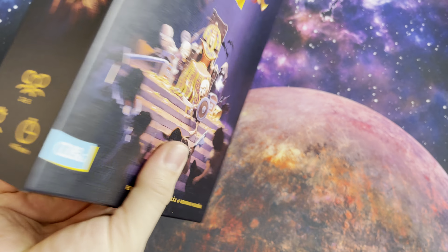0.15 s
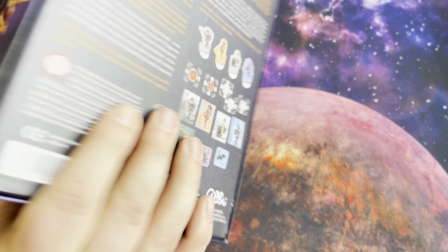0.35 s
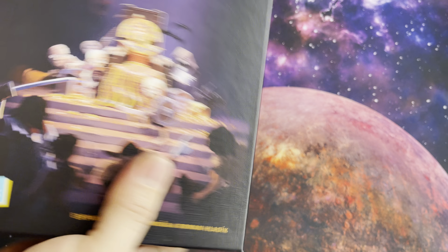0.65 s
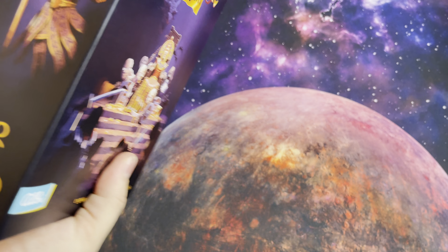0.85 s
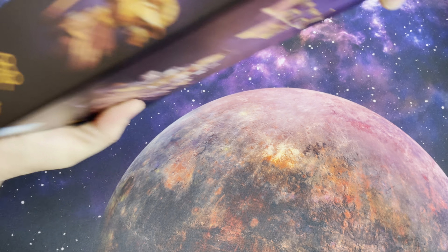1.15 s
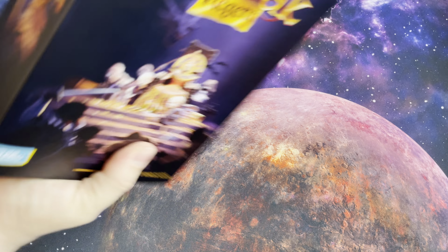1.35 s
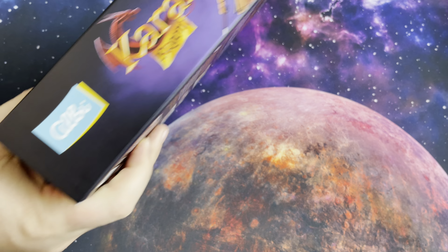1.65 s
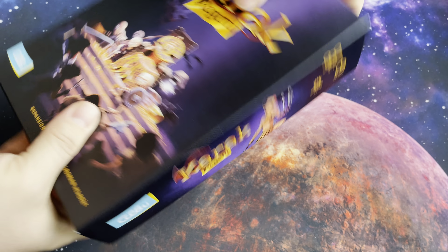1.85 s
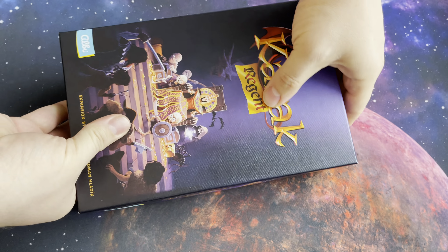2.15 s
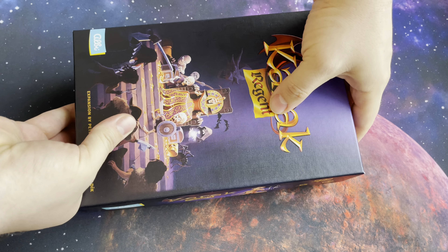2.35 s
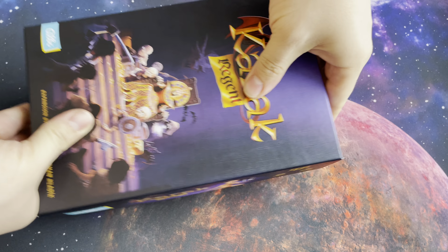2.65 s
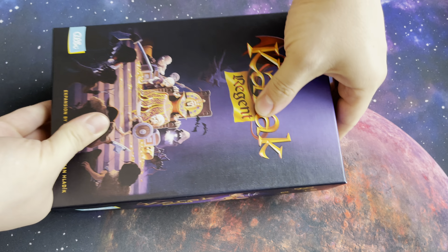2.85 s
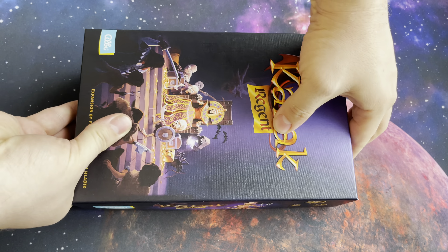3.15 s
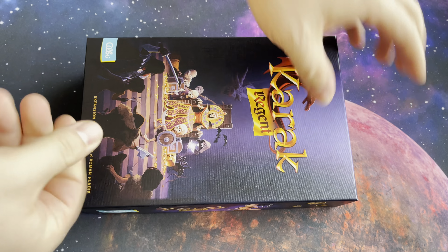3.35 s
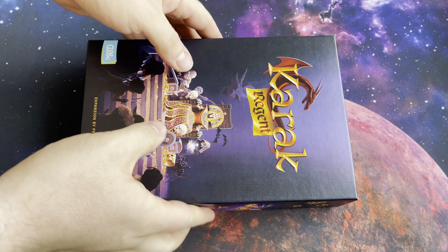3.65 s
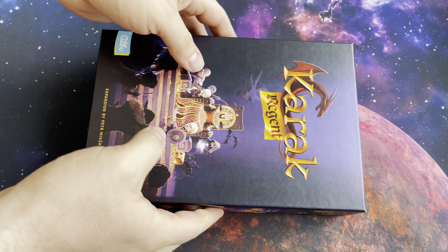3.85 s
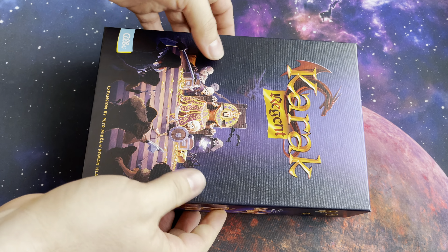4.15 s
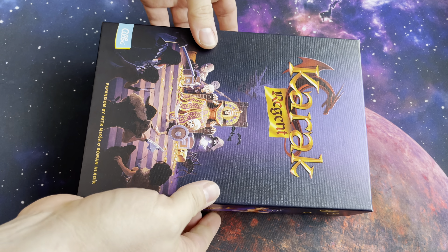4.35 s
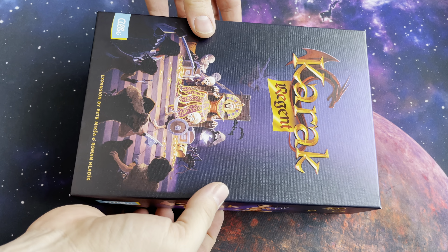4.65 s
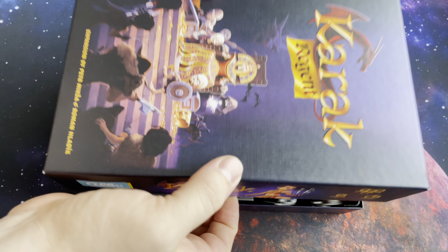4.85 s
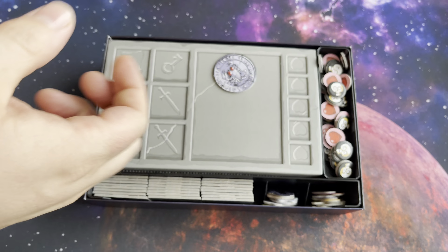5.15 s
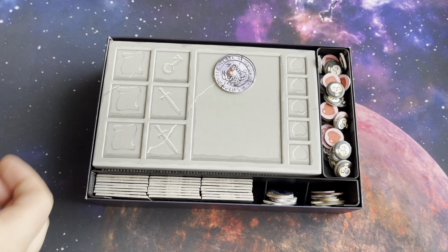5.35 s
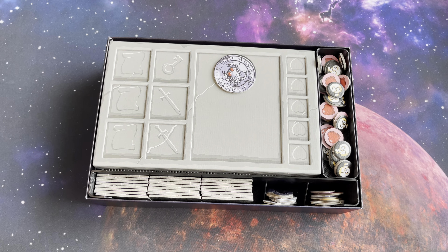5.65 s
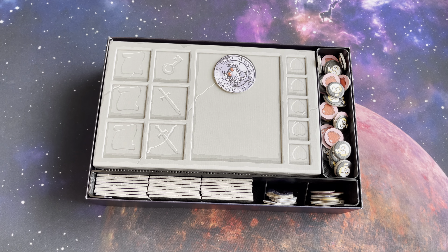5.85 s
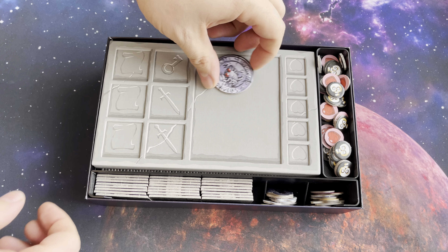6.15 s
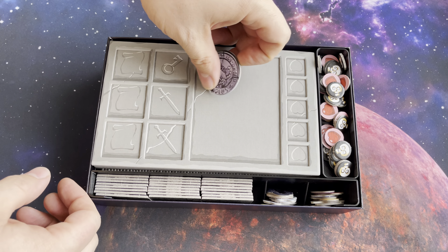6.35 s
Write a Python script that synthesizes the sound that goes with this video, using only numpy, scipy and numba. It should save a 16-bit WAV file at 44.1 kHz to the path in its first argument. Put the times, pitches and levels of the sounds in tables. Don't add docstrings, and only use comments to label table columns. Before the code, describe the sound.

Close up in a small quiet room, hands turn a full cardboard game box: loose tokens slide and knock in uneven bursts, with dry crackly snaps. The box comes down on a table with two deep thumps close together. Soft finger rubbing and faint taps follow, then the tight lid judders up with a low hollow groan and small squeaks. A few light touches on the plastic tray end it.

```python
import sys
import numpy as np
from scipy import signal
from scipy.fft import rfft, irfft
from scipy.io import wavfile
from numba import njit

SR = 44100
rng = np.random.default_rng(int(sys.argv[2]) if len(sys.argv) > 2 else 0)


def ratio_of_db(decibels):
    return 10 ** (np.asarray(decibels, float) / 20)


def int16_out(signal):
    q = np.round(np.clip(np.atleast_2d(signal).T, -1, 1) * 32767)
    wavfile.write(sys.argv[1], SR, q.astype(np.int16))


N = 286650
TIME = np.arange(N) / SR
REST_S = 3.5

# f/Hz, level/dB
CRACK_COLOUR = [(2500, -22), (3500, -7), (5600, -13.5), (8000, -15.5), (10300, -9.5), (11400, -17.5),
                (12300, -25.5)]


def level(x, db):
    return x * ratio_of_db(db) / np.sqrt(np.mean(x ** 2))


def band(x, lo_hz, hi_hz, order=2):
    return signal.sosfilt(signal.butter(order, [lo_hz, hi_hz], "band", fs=SR, output="sos"), x)


def colour(x, spectrum):
    hz, db = np.transpose(spectrum)
    n = x.shape[-1]
    bins_hz = np.fft.rfftfreq(n, 1 / SR)
    gain = ratio_of_db(np.interp(np.log(bins_hz + 1), np.log(hz), db))
    return irfft(rfft(x) * gain, n)


@njit
def svf(x, hz, width):
    y, b, l = np.empty(len(x)), 0., 0.
    for i in range(len(x)):
        g = np.tan(np.pi * hz[i] / SR)
        k = width / hz[i]
        v = (b + g * (x[i] - l)) / (1 + g * (g + k))
        b, l = 2 * v - b, l + 2 * g * v
        y[i] = k * v
    return y


def resonate(x, peaks):
    return sum(ratio_of_db(db) * svf(x, np.full(len(x), 1. * hz), 1. * width) for hz, width, db in peaks)


def grit(rate, scatter_db, smear_s, bed):
    sizes = (rng.random(N) < rate / SR) * ratio_of_db(scatter_db * np.minimum(rng.exponential(size=N), 1.6))
    puffs = signal.lfilter([1], [1, -np.exp(-1 / (smear_s * SR))], sizes)
    return (bed + level(puffs, 0)) * rng.standard_normal(N)


def hush():
    # f/Hz, level/dB
    air_colour = [(18, -31.5), (30, 10), (102, -2), (274, -8), (412, -7.5), (739, -23.5), (12100, -26.5),
                  (13100, -41.5)]
    return level(colour(rng.standard_normal(N), air_colour), -73)


@njit
def walls(x, lags, gain, damp):
    line, soft, out = np.zeros((8, 4096)), np.zeros(8), np.zeros((2, len(x)))
    for i in range(len(x)):
        total = 0.
        for k in range(8):
            soft[k] += (1 - damp) * (gain[k] * line[k, (i - lags[k]) & 4095] - soft[k])
            total += soft[k]
            out[k % 2, i] += soft[k] * (1 - (k & 2))
        for k in range(8):
            line[k, i & 4095] = x[i] + soft[k] - total / 4
    return out


def room_answer(x):
    t60_s, damp = 0.28, 0.21
    lags = rng.integers(150, 1400, 8)
    return walls(band(x, 300, 6000), lags, ratio_of_db(-60 * lags / SR / t60_s), damp)


def scatter(x, share):
    renew_s = 0.024
    hop, t = int(renew_s * SR), TIME[:SR // 40]
    count = N // hop + 2
    padded = np.concatenate([np.zeros(hop), x, np.zeros(2 * hop)])
    fade = np.sin(np.pi * np.arange(2 * hop) / (2 * hop))
    pieces = padded[np.arange(count)[:, None] * hop + np.arange(2 * hop)] * fade
    echoes = rng.standard_normal((count, len(t))) * np.exp(-t / 0.0036)
    echoes /= np.linalg.norm(echoes, axis=1, keepdims=True)
    out = np.zeros((count + 3) * hop)
    for k, piece in enumerate(signal.fftconvolve(pieces, echoes, axes=1)):
        out[k * hop:k * hop + len(piece)] += piece
    return share * band(out[hop:hop + N], 550, 12000, order=4)


def table(push):
    # f/Hz, level/dB, t60/s
    modes = [(75, -6, 0.36), (110, -2.5, 0.18), (148, -3, 0.26), (205, -17, 0.22), (269, -24, .25),
             (301, -22, 0.18), (409, -30, 0.26), (484, -36.5, 0.25), (651, -32, 0.25)]
    out = 0
    for hz, db, t60 in modes:
        pole = np.exp(2j * np.pi * hz / SR - np.log(1000) / (t60 * SR))
        out = out + ratio_of_db(db) * signal.lfilter([1], [1, -pole], push).imag
    return out


def table_shake():
    # t/s, level/dB
    effort = [(0.0, -58), (2.9, -61.5), (2.97, -49), (3.36, -37), (3.56, -59), (4.3, -55), (5.0, -48.5),
              (5.4, -75), (5.7, -59), (5.95, -83), (6.15, -53), (6.5, -87)]
    tremble = level(band(table(rng.standard_normal(N)), 44, 135), -0.77)
    return tremble * ratio_of_db(np.interp(TIME, *np.transpose(effort)))


def thumps():
    # t/s, peak level/dB, first f/Hz of the bending wave, its share/dB
    landings = [(0.266, -40.5, 395, 22.5), (0.345, -28, 450, 14.5), (0.634, -40.5, 320, 12),
                (0.709, -39.5, 470, 18), (1.555, -37.5, 320, 20.5), (2.396, -60, 457, -0.5),
                (2.553, -39, 492, 14), (2.747, -40, 517, 15.5), (2.941, -37, 253, -11),
                (3.0702, -8.5, 308, -12.5), (3.096, -19, 203, -1), (3.206, -36.5, 262, 14),
                (3.226, -26, 405, 8), (3.245, -16, 530, 8), (3.2454, -5.5, 260, -10.5),
                (3.275, -22.5, 300, 0), (3.636, -32, 384, 7), (3.681, -30.5, 288, 5.5),
                (4.799, -29, 314, -20), (4.81, -42, 455, 13), (4.96, -34, 670, -9), (4.991, -32.5, 420, 1),
                (5.146, -30, 322, 2), (5.518, -34, 288, -4), (5.543, -32, 247, 4.5),
                (6.065, -40.5, 664, -3), (6.101, -36, 259, -20)]
    push, wave, t = np.zeros(N), np.zeros(N + SR), TIME[:SR // 10]
    for s, db, first_hz, wave_db in landings:
        i = int(s * SR)
        push[i] += ratio_of_db(db)
        turns = np.cumsum(100 + (first_hz - 100) * np.exp(-t / 0.014)) / SR
        wave[i:i + len(t)] += ratio_of_db(db + wave_db) * np.sin(2 * np.pi * turns) * np.exp(-t / 0.0087)
    contact = np.hanning(int(0.0061 * SR))
    soft_push = np.convolve(push, contact / contact.sum())[:N]
    return wave[:N] + ratio_of_db(-4.5) * table(soft_push)


def lid():
    # t/s, cavity f/Hz, level/dB
    air_gap = [(4.3, 257, -63), (4.45, 262, -46), (4.534, 290, -41), (4.612, 240, -50), (4.686, 271, -35.5),
               (4.779, 533, -37.5), (4.801, 456, -72)]
    # f/Hz, width/Hz, level/dB
    lid_sides = [(830, 130, 28.5), (1500, 500, 4.5), (2270, 133, 8)]
    # t/s, level/dB
    squeaks = [(4.22, -71), (4.46, -60), (4.51, -54), (4.6, -95), (4.889, -79), (4.945, -52), (4.98, -70.5),
               (5.06, -55.5)]
    s, hz, db = np.transpose(air_gap)
    s_rim, rim_db = np.transpose(squeaks)
    slips = grit(140, scatter_db=3.0, smear_s=0.006, bed=1.2)
    centre = np.interp(TIME, s, hz)
    gap = svf(svf(slips, centre, 122.0), centre, 130.0)
    groan = level(gap, -0.27) + level(band(resonate(slips, lid_sides), 480, 2740), -6.0)
    rim = level(band(resonate(slips, [(2530, 200, 0)]), 1900, 3300), -1.3)
    groan = groan * ratio_of_db(np.interp(TIME, s, db, -200, -200))
    return groan + rim * ratio_of_db(np.interp(TIME, s_rim, rim_db, -200, -200))


def snaps():
    # t/s, peak level/dB, length/dB over 1.6 ms
    snap_events = [(0.0228, -23, 17), (0.0747, -12.5, -2), (0.2675, -17, 21), (0.3461, -2, 11.5),
                   (0.5477, -31, 35.5), (0.633, -20.5, -10), (0.656, -9, -15), (0.714, -26, -6),
                   (0.7777, -12, 19), (0.845, -19, -2), (1.0666, -26, 13), (1.1178, -16.5, -2.5),
                   (1.3419, -23, -9), (1.5576, -15, 0), (1.5808, -17.5, 1), (1.7607, -21, -22),
                   (1.8158, -44, -5), (1.8655, -18.5, 2), (1.8833, -19.5, 22), (1.9922, -25.5, -3),
                   (2.5588, -14.5, 12.5), (2.655, -20, 9), (2.7525, -18, 6), (3.244, -7, -4.5),
                   (3.601, -44, -7), (4.994, -34.5, -2), (5.144, -36.5, 12), (6.0632, -31, -12.5),
                   (2.9282, -47, 1), (2.9714, -43, -8), (2.987, -38.5, -10), (3.0269, -36, 1),
                   (3.167, -41.5, -8), (3.197, -36.5, -5), (0.6107, -30, -8), (1.2658, -30, 5),
                   (1.4219, -33, -8), (1.8475, -34.5, -7.5), (2.6711, -23.5, 4), (2.565, -19.5, 5),
                   (1.7628, -21.5, 8)]
    out, t = np.zeros(N + SR), TIME[:SR // 10]
    for (s, db, length_db), noise in zip(snap_events, rng.standard_normal((len(snap_events), len(t)))):
        envelope = (1 - np.exp(-t / 0.000078)) * np.exp(-t / (0.0016 * ratio_of_db(length_db)))
        puff = colour(noise, CRACK_COLOUR) * envelope
        i = int(s * SR)
        out[i:i + len(t)] += ratio_of_db(db - 5.0) * puff / np.abs(puff).max()
    return out[:N]


def strokes():
    # start t/s, hold/s, slide level/dB, hollow wall/dB over slide, skin hiss/dB over slide
    tumbles = [(0.0, 0.064, -33, -2, -7), (0.193, 0.037, -57.5, 7.5, -2), (0.274, 0.0053, -30.5, -0.5, -9),
               (0.342, 0.0079, -20.5, -4, -6.5), (0.41, 0.21, -48.5, 1, -9), (0.636, 0.062, -41, -3.5, 1),
               (0.719, 0.0092, -31.5, -1.5, -11), (0.781, 0.02, -33, -3.5, -3),
               (0.891, 0.25, -50.5, -0.5, -1.5), (1.095, 0.013, -30.5, -1.5, -27),
               (1.232, 0.12, -40, -5, -14), (1.357, 0.15, -46, 0.5, -4), (1.543, 0.068, -33.5, -4, -10.5),
               (1.647, 0.071, -55.5, -3, 1.5), (1.768, 0.052, -35.5, -4, -17),
               (1.88, 0.036, -31.5, -1.5, -13), (1.897, 0.097, -40.5, -9, -10),
               (1.986, 0.11, -53, 2.5, 2.5), (2.107, 0.14, -53.5, 3.5, -5.5)]
    settles = [(2.402, 0.052, -63.5, 7, -7), (2.471, 0.029, -49, -3.5, -11), (2.539, 0.015, -37.5, -1, -14),
               (2.559, 0.0064, -27, -9, -21), (2.619, 0.044, -38.5, -8, -15), (2.656, 0.015, -31, -6, -20),
               (2.739, 0.019, -30.5, -8.5, -13), (2.804, 0.073, -50.5, 0, -13),
               (2.938, 0.132, -57, 7.5, -2), (3.054, 0.054, -46, 2, -18), (3.122, 0.18, -52, 3, -6),
               (3.239, 0.011, -38.5, 12.5, -3.5)]
    touches = [(3.609, 0.032, -63.5, 2, -8.5), (3.656, 0.041, -58.5, 12.5, -2), (3.733, 0.15, -61.5, 6, 6),
               (3.932, 0.071, -71, 9, -18), (4.041, 0.13, -70, 12.5, -0.5), (4.215, 0.26, -61, 9, 1),
               (4.409, 0.13, -61, 12.5, 4.5), (4.662, 0.11, -58.5, 13, 7), (4.804, 0.0089, -64, 20, 8),
               (4.941, 0.01, -56, -4, 2), (5, 0.19, -58, 3, 12), (5.21, 0.14, -59, -7, 5),
               (5.33, 0.022, -58.5, 0.5, -17), (5.522, 0.049, -66, 16, 6), (5.642, 0.029, -61.5, -0.5, 8.5),
               (6.053, 0.017, -53, 0, -11.5), (6.168, 0.03, -51.5, -6.5, -3.5), (6.22, 0.054, -68, 2, 9.5),
               (6.319, 0.058, -66, -19.5, 9.5), (6.402, 0.11, -70.5, -16.5, 15.5)]
    rise_db_per_s, touch_rise_db_per_s = 654, 1307
    fall_db_per_s, skin_fall_db_per_s = 271.5, 331.5
    slide, hollow, skin = np.zeros((3, N))
    for s, hold_s, db, hollow_db, skin_db in tumbles + settles + touches:
        rise = rise_db_per_s if s <= tumbles[-1][0] else touch_rise_db_per_s
        i = slice(max(int((s - .2) * SR), 0), int((s + hold_s + .4) * SR))
        early = np.maximum(s - TIME[i], 0)
        late = np.maximum(TIME[i] - s - hold_s, 0)
        power = ratio_of_db(2 * (db - rise * early - fall_db_per_s * late))
        slide[i] += power
        hollow[i] += power * ratio_of_db(2 * hollow_db)
        skin[i] += ratio_of_db(2 * (db + skin_db - rise * early - skin_fall_db_per_s * late))
    return np.sqrt([slide, hollow, skin])


def handling():
    # f/Hz, level/dB
    slide_colour = [(71, -38), (120, -0.5), (377, 5.5), (1080, -5), (1210, -23.5), (2140, -13),
                    (6000, -24.5), (7800, -56.5)]
    # f/Hz, level/dB
    skin_colour = [(2500, -27), (3500, -10.5), (5000, -5), (7000, -5), (8500, -3.5), (10300, 7),
                   (11400, -4), (12300, -23.5)]
    # t/s, f/Hz
    free_wall = [(0.0, 1400), (.35, 1129), (1.7, 1269), (2.3, 882), (2.65, 1500), (2.9, 919), (5.6, 846.5),
                 (6.4, 1443)]
    wall_hz = np.interp(TIME, *np.transpose(free_wall))
    rub = grit(1400, scatter_db=-3.0, smear_s=0.0008, bed=0.58)
    skin = colour(grit(110, scatter_db=1.5, smear_s=0.0016, bed=2.2), skin_colour)
    rubbed_box = colour(rub, slide_colour)
    slide = level(band(rubbed_box, 500, 4500), -3.0) + level(svf(rub, wall_hz, 700.0), -5.5)
    grains = grit(450, scatter_db=6.0, smear_s=0.00025, bed=0.01)
    slide = slide + level(band(grains, 980, 5500), -15)
    hollow = level(band(rubbed_box, 170, 652), 0.14)
    resting = TIME > REST_S
    slide = np.where(resting, slide + level(svf(rub, wall_hz, 480.0), -14.5), slide)
    hollow = np.where(resting, level(band(rubbed_box, 168, 437), 0.1), hollow)
    return (strokes() * [slide, hollow, level(skin, -4.0)]).sum(axis=0)


def knocks():
    # t/s, peak level/dB, ring f/Hz, contact length/dB over 1.5 ms
    tokens = [(0.203, -38.5, 930, 6.5), (0.268, -34.5, 1070, 10.5), (0.275, -16.5, 2380, 22.5),
              (0.322, -14.5, 2330, 0.5), (0.345, -5, 1040, 13.5), (1.196, -33, 1200, 0),
              (0.58, -29.5, 890, -13), (0.636, -24.5, 760, -15), (0.653, -21.5, 1180, 24),
              (0.718, -23, 670, 6), (0.782, -18.5, 1610, 28.5), (0.883, -33, 1060, -6.5),
              (0.946, -51, 756, 4.5), (1.076, -25.5, 1400, -10.5), (1.087, -12.5, 1270, -9),
              (1.093, -1.5, 1287, -1.5), (1.227, -19, 1800, -22), (1.255, -26.5, 880, 2.5),
              (1.321, -22.5, 1950, -5.5), (1.424, -28, 2230, 12.5), (1.493, -35.5, 890, 36),
              (1.556, -15, 830, 14.5), (1.6, -25, 1140, 11), (1.762, -12.5, 3120, -2.5),
              (1.799, -20, 980, -6), (1.821, -18, 960, 3.5), (1.8235, -12.5, 1050, -4.5),
              (1.8465, -17.5, 880, -10.5), (1.895, -21.5, 680, 19.5), (1.991, -20.5, 4300, -27.5)]
    corners = [(2.494, -35, 740, -4.5), (2.524, -30, 805, 2), (2.56, -10, 3040, -6), (2.651, -24, 990, 1),
               (2.672, -18.5, 790, 3), (2.735, -26, 890, -7.5), (2.752, -28.5, 664, 2.5),
               (2.753, -4.5, 3446, -6.5), (2.847, -31.5, 830, 9.5), (3.068, -28, 1000, -25),
               (3.101, -30, 1000, -12), (3.199, -34.5, 880, -5.5), (3.226, -26, 715, -3),
               (3.242, -13, 810, 22)]
    ticks = [(3.6, -60.5, 750, 3.5), (3.636, -30.5, 605, -9.5), (4.228, -40.5, 746, -9),
             (4.491, -29.5, 830, 23), (4.43, -48, 795, 6), (6.47, -46, 1100, 5), (4.52, -27.5, 900, -23),
             (4.621, -38, 840, -14.5), (4.685, -36, 810, 8), (4.768, -31, 742, 29), (4.922, -35.5, 850, -7),
             (4.953, -34, 810, 18), (4.995, -30.5, 800, 23), (5.141, -39.5, 830, 29), (5.321, -33, 816, -6),
             (5.332, -35.5, 910, -17), (5.511, -50, 1075, -1), (5.662, -39.5, 990, -6),
             (6.053, -44, 1065, -1), (6.062, -57.5, 895, 6), (6.336, -44, 2100, 29.5),
             (6.458, -44.5, 1050, 41.5)]
    further_knocks = [(0.261, -26.5, 2330, 6), (0.3337, -11, 1860, 0), (0.364, -10, 1090, 21.5),
                         (0.345, -10.5, 2470, 4.5), (0.53, -35.5, 2580, 11), (0.556, -31, 2900, -8),
                         (0.611, -28, 2350, 1), (0.983, -36.5, 1462, -6), (1.005, -31.5, 3570, 0),
                         (1.026, -31.5, 520, 0), (1.206, -31, 1260, 4), (1.217, -40, 1400, -11.5),
                         (1.232, -21, 1870, 0.5), (1.273, -29.5, 1210, 2), (1.304, -25, 3200, -16),
                         (1.342, -26.5, 1640, 16), (1.455, -26, 2370, -17.5), (1.513, -21, 2020, -11),
                         (1.548, -24, 1000, -2), (1.572, -17.5, 1300, 7), (1.58, -22, 910, 21),
                         (1.632, -21.5, 1410, 7), (1.727, -37, 1390, 6), (1.757, -18, 3050, -19),
                         (1.866, -25, 790, 4), (1.952, -22.5, 1500, -1), (2.047, -35, 2880, 3),
                         (2.121, -41, 1830, -13), (2.158, -36.5, 1700, 0), (2.46, -41.5, 1450, -3),
                         (2.478, -40, 2600, -5), (2.541, -26, 1367, 7.5), (2.556, -12, 2460, -5.5),
                         (2.567, -6.5, 3074, 2), (2.657, -26, 2530, -2), (2.672, -18.5, 2610, -6),
                         (2.741, -18.5, 1630, -1.5), (4.398, -45, 818, 9), (4.511, -29.5, 830, -8),
                         (4.574, -37, 793, -1), (4.64, -38, 937, 15), (4.699, -28, 860, -6), (4.734, -43.5, 1500, 11),
                         (5.521, -44, 893, 5), (5.546, -48, 1200, 10), (5.327, -51, 1300, 11), (0.34, -26, 780, 9.5),
                         (0.029, -25.5, 2900, 33), (6.071, -44, 1830, 13), (6.175, -51.5, 2180, 19.5),
                         (3.658, -44, 1300, -6), (3.689, -39, 1400, 8), (3.726, -49, 800, 0), (3.895, -48, 1150, 2),
                      (3.945, -45.5, 800, 5.5), (3.957, -50, 1150, 3), (4.043, -50.5, 900, 5), (4.113, -50, 800, 1),
                      (4.14, -55, 850, 2), (4.178, -54, 720, 3), (4.199, -47, 760, 11), (4.268, -55, 1100, -1),
                      (4.322, -54, 800, 1), (4.359, -48, 800, 5), (0.344, -11, 6500, 7.5), (0.268, -25.5, 5300, 4.5),
                      (0.884, -32.5, 2000, -3), (0.783, -21, 3700, 9.5), (1.765, -24, 1300, 16.5),
                      (2.524, -29.5, 1500, -5), (2.567, -19.5, 2900, 3), (2.7544, -11, 2943, -3),
                      (3.075, -44, 2300, -1.5), (3.103, -44.5, 2400, -0.5), (3.126, -43.5, 2600, -5.5),
                      (3.166, -43.5, 2100, -8.5), (3.197, -39.5, 2300, -5.5), (4.996, -41, 1300, -4),
                      (5.003, -37, 850, 14), (5.322, -34.5, 1150, -10)]
    crack_db = -25.5
    out, t = np.zeros(N + SR), TIME[:SR // 10]
    rows = tokens + corners + ticks + further_knocks
    for (s, db, hz, length_db), noise in zip(rows, rng.standard_normal((len(rows), 2, len(t)))):
        tau = 0.0015 * ratio_of_db(length_db)
        rattle = (1 - np.exp(-t / 0.00029)) * (np.exp(-t / tau) + 0.021 * np.exp(-t / 0.016))
        blow = 1.5 * np.exp(-((t - .0006) * hz * 3) ** 2)
        upper_db = -16 if s > REST_S else -11
        walls_rung = [(hz, 0.22 * hz, 0), (1.515 * hz, 0.53 * hz, upper_db), (0.31 * hz, 0.34 * hz, -12)]
        ring = resonate(blow + noise[0] * rattle, walls_rung)
        ring = band(ring, 0.6 * hz, min(3.5 * hz, 9000))
        crack = colour(noise[1], CRACK_COLOUR) * rattle ** 1.5
        tick = ring / np.abs(ring).max() + ratio_of_db(crack_db) * crack / np.abs(crack).max()
        i = int(s * SR)
        out[i:i + len(t)] += ratio_of_db(db - 3.0) * tick
    return out[:N]


def two_ports(near, low):
    pan_db, near_db = 4.5, 1
    lag = 5.5
    in_step_hz, turn_hz = 8500, 3270
    body = signal.sosfiltfilt(signal.butter(4, 7900, fs=SR, output="sos"), near)
    top = near - body
    hz = np.fft.rfftfreq(N, 1 / SR)
    late_top = irfft(rfft(top) * np.exp(2j * np.pi * (hz - in_step_hz) / turn_hz), N)
    echoes = scatter(body, share=0.81)
    late_body = irfft(rfft(body - echoes) * np.exp(-2j * np.pi * hz * lag / SR), N)
    right_low = low - 0.28 * band(low, 220, 600, order=1)
    left = (body + echoes) * ratio_of_db(pan_db / 2 + near_db) + top + low * ratio_of_db(-1.5)
    right = late_body * ratio_of_db(-pan_db / 2 + near_db) + late_top + right_low * ratio_of_db(-3.0)
    return np.array([left, right])


def scene():
    near = handling() + knocks() + snaps() + lid() + hush()
    low = thumps() + table_shake()
    room = room_answer(near + low)
    wide = .6 * band(hush(), 300, 6500) * np.array([[1], [-1]])
    return two_ports(near, low) + ratio_of_db(-13) * room + wide


def top_cut(x):
    return signal.sosfilt(signal.butter(12, 13240, fs=SR, output="sos"), x)


def record(dry):
    wet = signal.sosfilt(signal.butter(4, 58, "high", fs=SR, output="sos"), dry)
    wet = signal.sosfilt(signal.ellip(5, .5, 28, 12700, fs=SR, output="sos"), wet)
    wet = np.tanh(.8 * wet) / .8
    return top_cut(wet)


dry = scene()
out = record(dry)
int16_out(out)
```